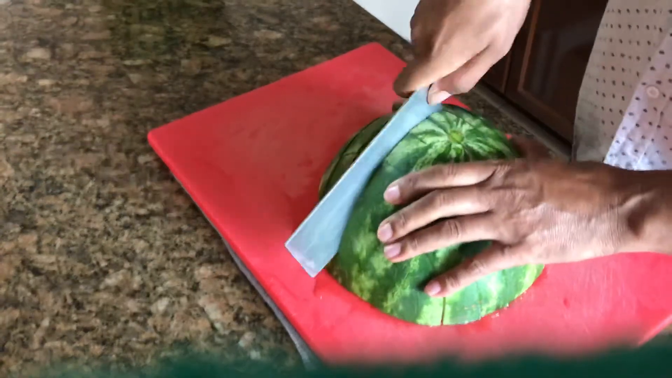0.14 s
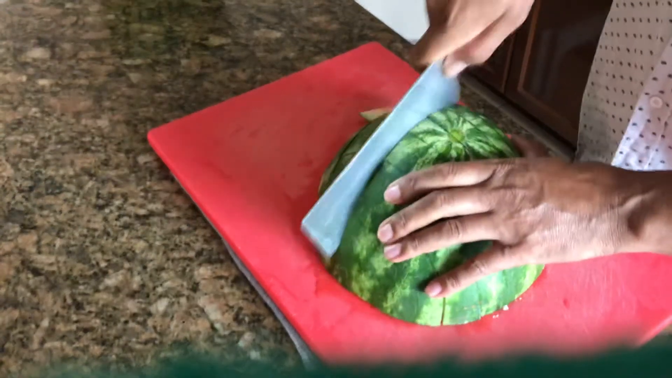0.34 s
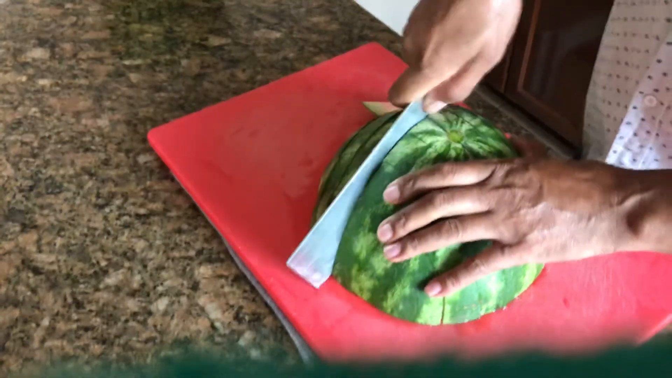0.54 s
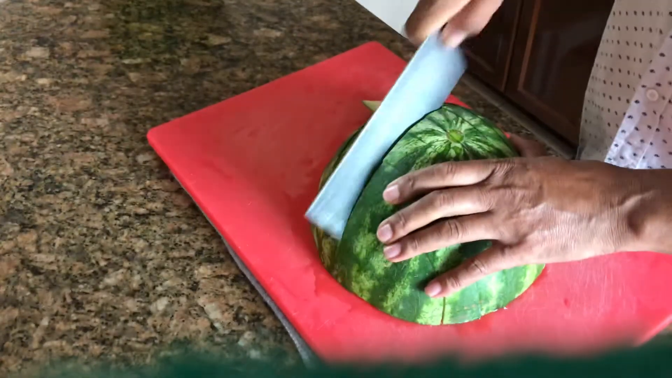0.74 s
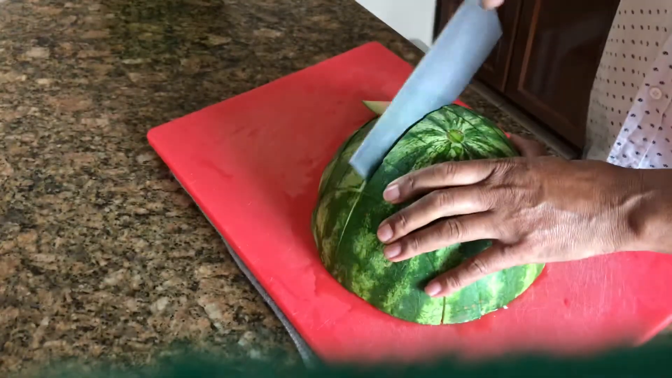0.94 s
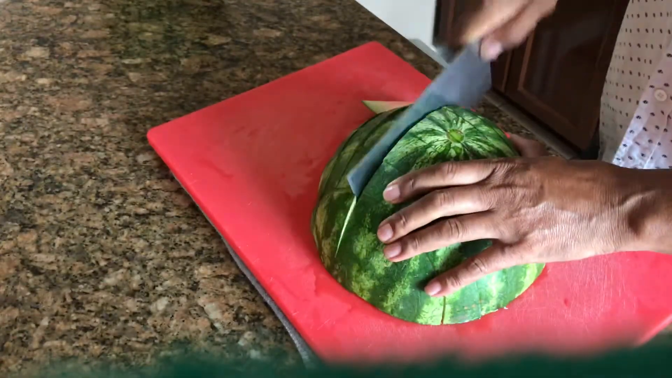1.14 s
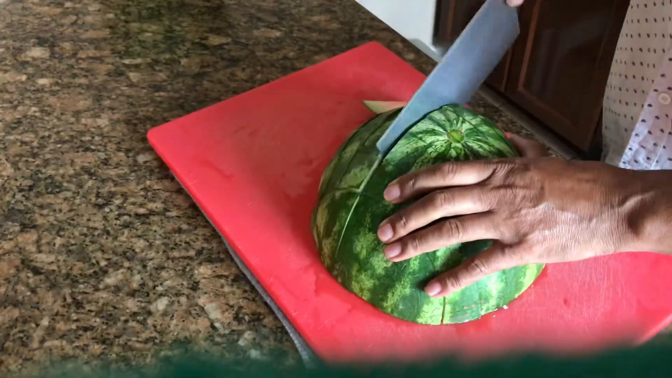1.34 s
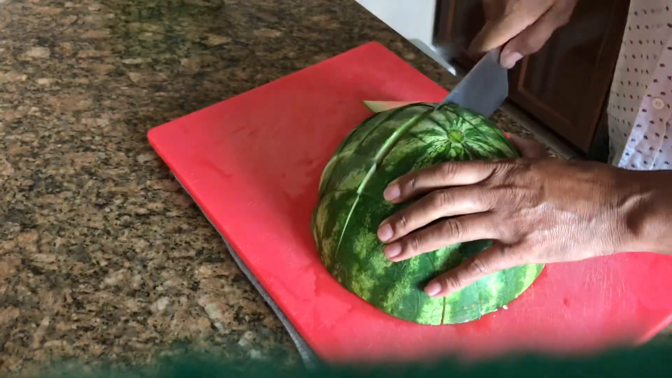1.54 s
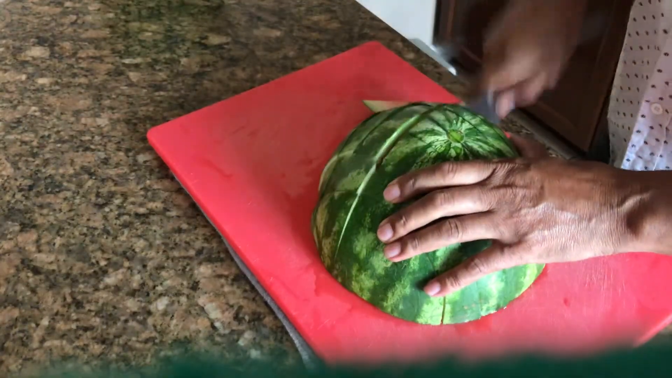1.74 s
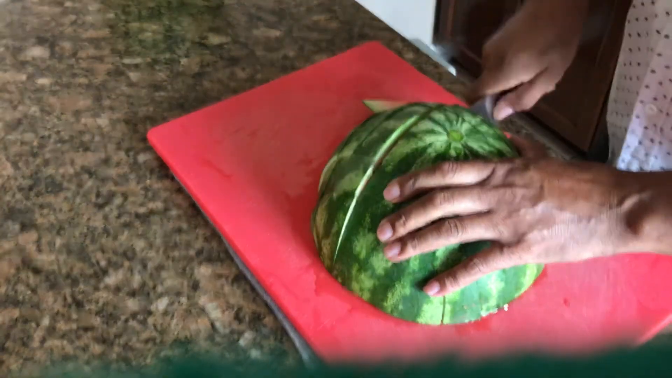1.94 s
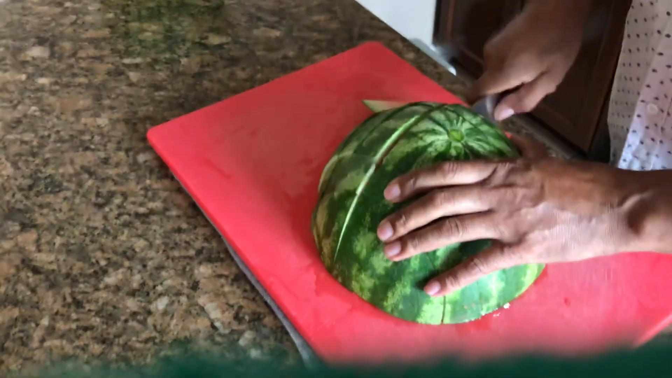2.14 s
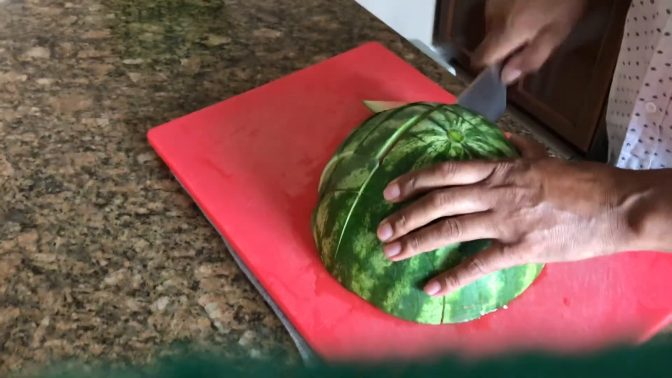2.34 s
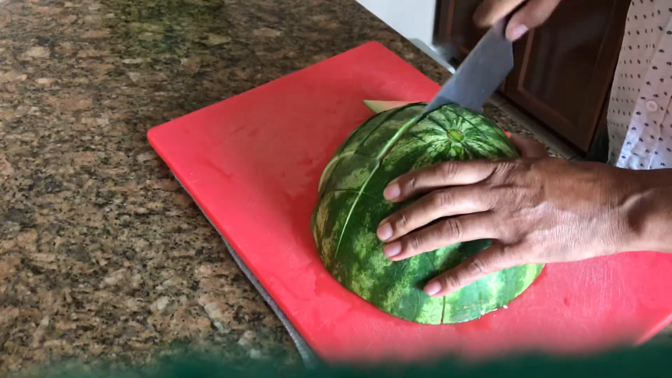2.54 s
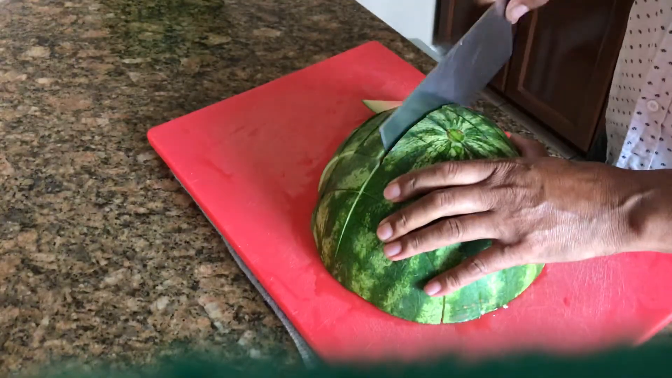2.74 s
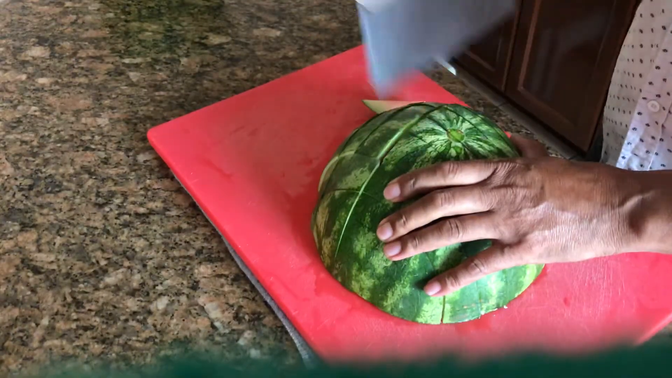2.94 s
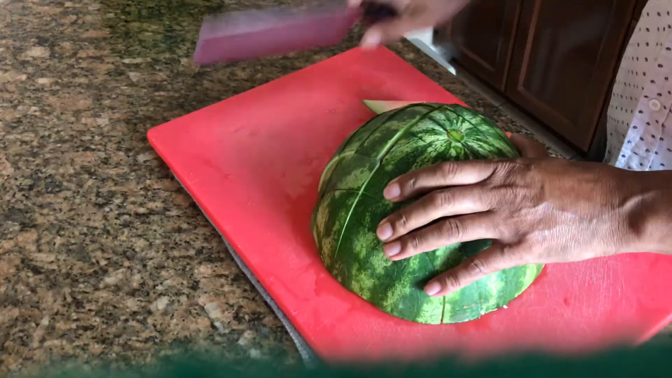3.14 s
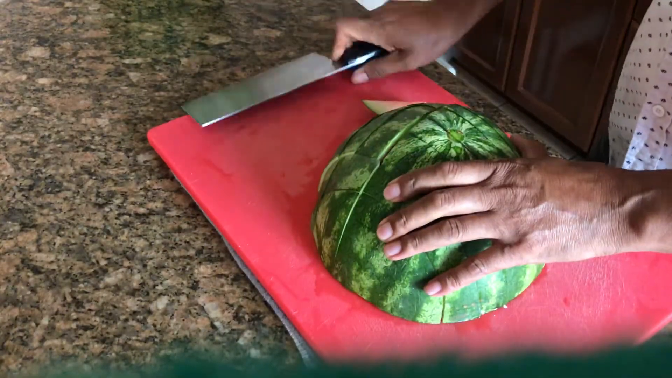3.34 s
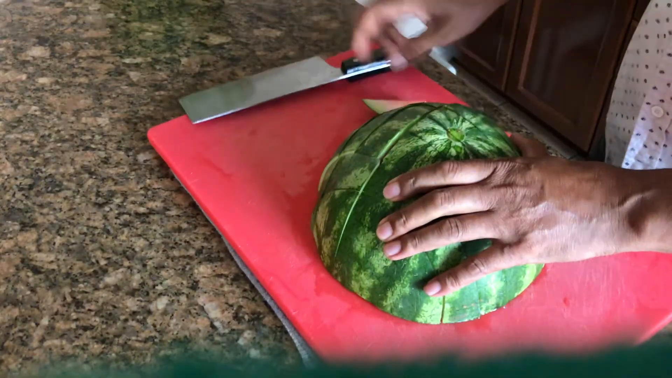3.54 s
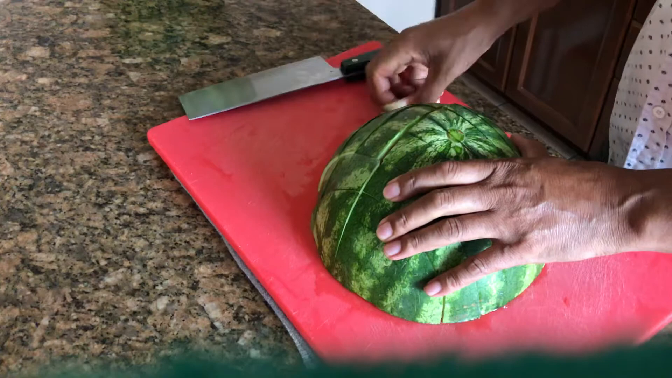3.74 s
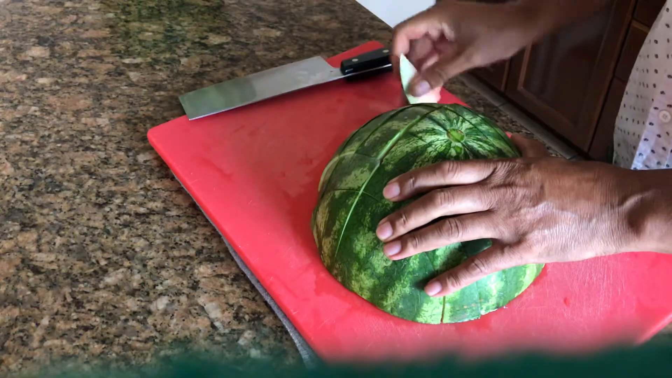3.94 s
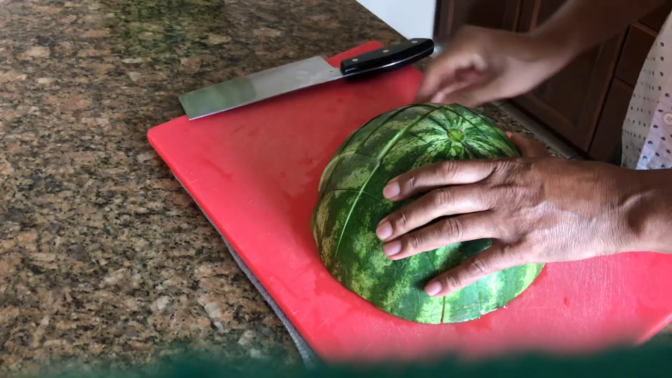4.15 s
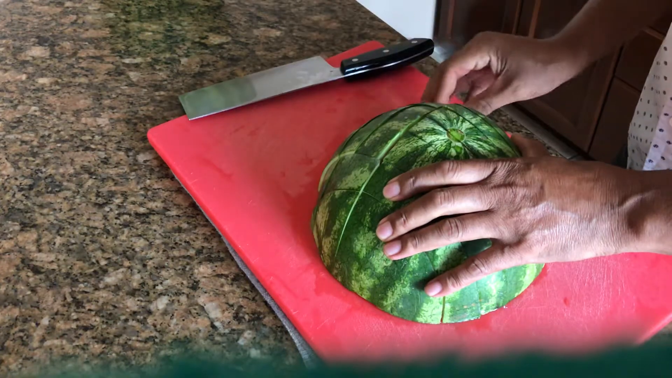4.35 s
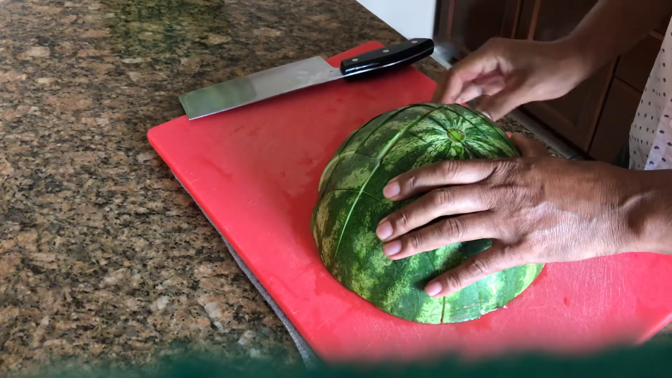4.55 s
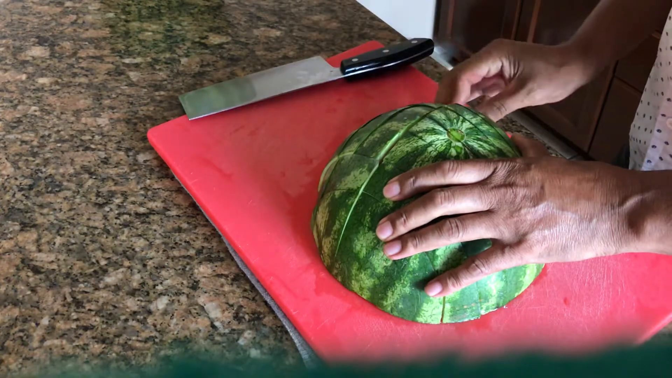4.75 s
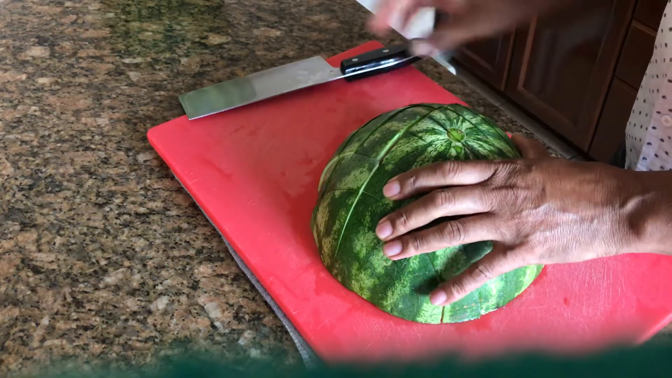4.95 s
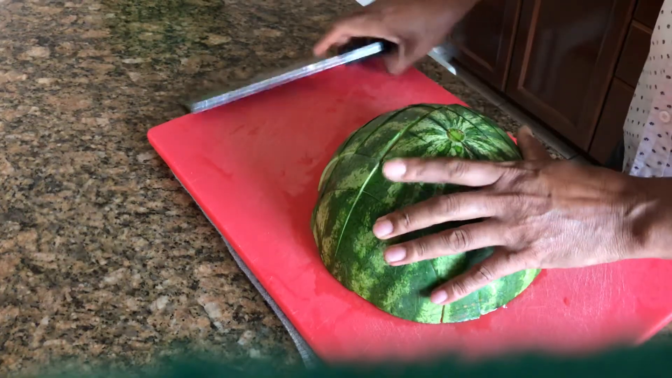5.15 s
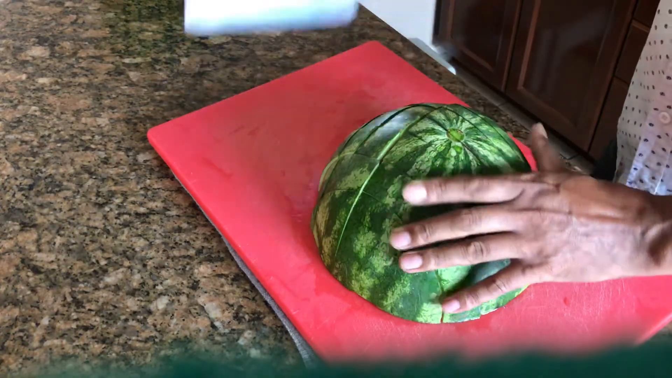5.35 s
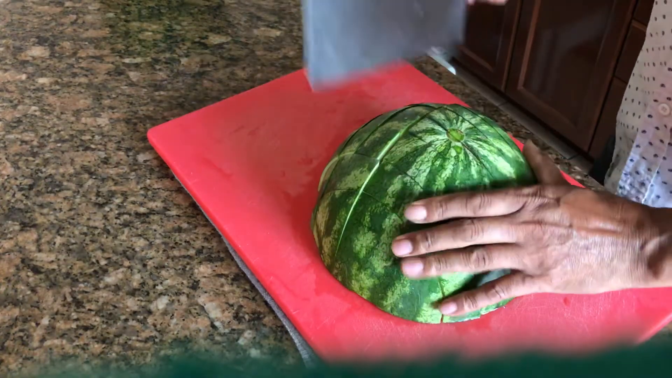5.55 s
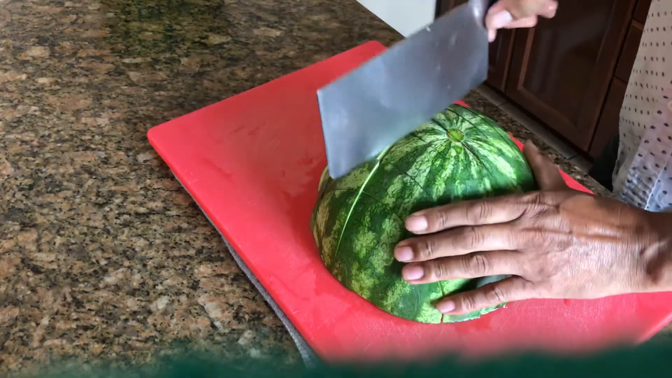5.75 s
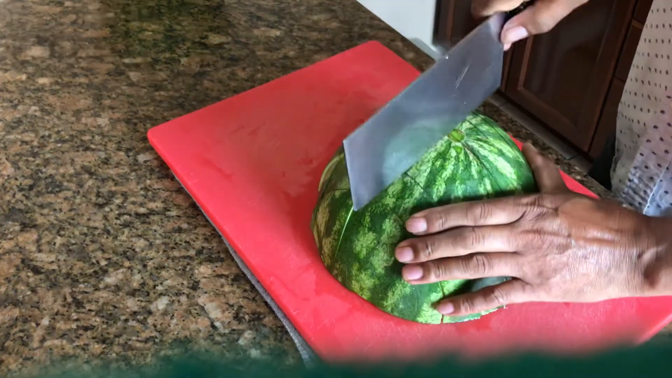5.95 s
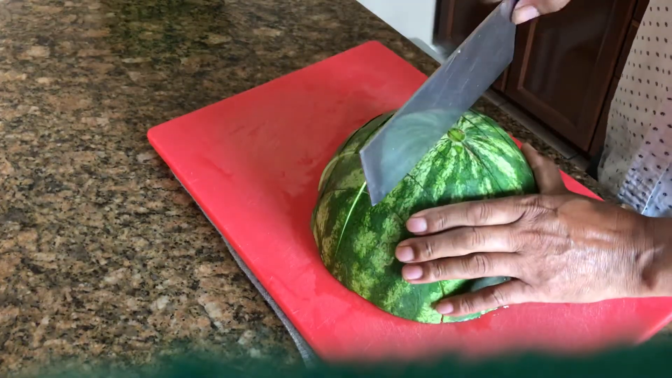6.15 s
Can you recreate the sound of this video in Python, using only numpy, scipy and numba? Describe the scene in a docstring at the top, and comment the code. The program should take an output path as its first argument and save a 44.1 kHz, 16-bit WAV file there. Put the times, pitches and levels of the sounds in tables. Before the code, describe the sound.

A close microphone in a small reflective kitchen, with steady low appliance hum throughout. From 0 to 0.45 seconds a blade slides through wet rind in short gritty hisses with a tiny wet tick, ending in a loud hollow knock on a plastic board at 0.46. Softer slides come around 1.1 to 1.6, with faint high bird chirps, then a crisper knock with a low counter thump at 1.8. Weak dull bumps follow at 2.0 and 2.2, then near quiet, with fainter chirps around 3. At 3.3 to 3.6 the cleaver is laid down in a quick clatter, loudest at 3.5, its ring choked. Faint wet rubbing passes around 4.5. At 5.1 to 5.2 the blade scrapes up with a bright steel ring, stilled by about 5.6. Distant chirps, a soft slide, and at 5.95 a small wet tick as the blade meets rind.

```python
"""Wet slides of blade and fingers on melon rind, then a cleaver knocking on a plastic board on a stone counter:
noise grains under bell-shaped pushes, and struck modes for board and counter. The cleaver is laid down with
a clatter and lifted again, ringing: steel modes driven by gritty scrapes, with damping that changes in time.
Wet ticks are short noise bursts. A small hard kitchen echoes it over appliance hum (shaped noise and tones)
and a bird outside (warbled sine chirps)."""
import sys
import numpy as np
from scipy import signal
from scipy.fft import rfft, irfft, next_fast_len
from scipy.io import wavfile
from scipy.ndimage import uniform_filter1d
from numba import njit

SR = 44100
rng = np.random.default_rng(int(sys.argv[2]) if len(sys.argv) > 2 else 0)


def inscribe(sig):
    """Save sig as 16-bit PCM at rate SR to the path in sys.argv[1].

    A 1-D sig is mono; a 2-D sig holds one channel per row.
    Samples are clipped to [-1, 1] before scaling.
    """
    pcm = np.round(np.clip(np.atleast_2d(sig).T, -1, 1) * 32767)
    wavfile.write(sys.argv[1], SR, pcm.astype(np.int16))


N = 276948
T = np.arange(N) / SR  # s


def undb(db):
    """Decibels to gain."""
    return 10 ** (np.asarray(db) / 20)


def unit(x):
    """Scale to rms 1."""
    return x / np.sqrt(np.mean(x ** 2))


def band(x, hz, width_hz):
    """Two-pole band-pass, gain 1 at the centre."""
    return signal.lfilter(*signal.iirpeak(min(hz, .45 * SR), hz / width_hz, SR), x)


def shaped(points):
    """Noise of rms 1 with the spectrum of the (Hz, dB) points."""
    hz, db = np.transpose(points)
    size = next_fast_len(N, True)
    log_hz = np.log(np.arange(size // 2 + 1) * SR / size + 1)
    spectrum = rfft(rng.standard_normal(size)) * undb(np.interp(log_hz, np.log(hz), db))
    return unit(irfft(spectrum, size)[:N])


def walk(rate_hz):
    """Random levels held for 1 / rate_hz, smoothed twice over that span; rms 1."""
    hold = int(SR / rate_hz)
    steps = np.repeat(rng.standard_normal(N // hold + 1), hold)
    return unit(uniform_filter1d(uniform_filter1d(steps, hold), hold)[:N])


def add(track, start_s, sound):
    """Mix a sound into the track at start_s."""
    i = int(start_s * SR)
    track[i:i + len(sound)] += sound[:N - i]


def struck(modes, contact_ms, tilt_db=0., rise_ms=0.88, sign=-1):
    """Modes answer one smooth push, duller with longer contact; signs alternate unless sign is 1. Peak 1."""
    t = T[:int(1.3 * SR * np.max(modes, axis=0)[-1])]
    free = 0
    for k, (hz, db, t60_s) in enumerate(modes):
        gain = sign ** k * undb(db + tilt_db * np.log2(hz / 800))
        free = free + gain * np.sin(2 * np.pi * hz * t) * 1000. ** (-t / t60_s)
    push = np.sin(np.pi * np.clip(T[:SR // 20] * 1000 / contact_ms, 0, 1)) ** 2
    out = signal.fftconvolve(free * (1 - np.exp(-t * 1000 / rise_ms)), push)
    return out / np.abs(out).max()


def board():
    """Each contact: a hollow knock, a boom, a slow thump of the counter and a short noise crack."""
    # cleaver blows: edge on the board, plus faint ticks and the blade set down on the rind:
    # start_s, knock_db, boom_db, thump_db, contact_ms, knock_tilt_db_per_octave, crack_hz
    blows = [(0.255, -39.5, -33, -45, 0.78, -18, 3800), (.463, -1.75, -13, -39, 0.84, 2.8, 4000),
             (1.7907, -1.5, -8, -29.5, 0.39, 5, 2396), (2.0255, -24.5, -26, -28, 1.07, -0.5, 2000),
             (2.2224, -23, -22.5, -29, 0.87, -5, 1870), (2.275, -45, -30.5, -42.5, 0.63, -1, 2010),
             (4.179, -63, -47, -51, .65, 4, 2700), (5.944, -62.5, -52.5, -35.5, 0.86, -1, 3500)]
    # cleaver clatter: laid down (3.34 to 3.74 s), then lifted off the board (5.13 to 5.21 s):
    # start_s, knock_db, boom_db, thump_db, crack_db, knock_tilt_db_per_octave
    clatter = [(3.34, -18.5, -27.5, -48.5, -20, 0.5), (3.414, -15.5, -23.5, -52, -19, -8),
               (3.451, -22, -36, -45, -24, -10), (3.48, -28, -44, -42, -26, 0),
               (3.494, -4, -16.5, -37, -10.5, 14.5), (3.533, -14.5, -22.5, -39.5, -19.5, 5.5),
               (3.568, -17, -32, -56.5, -22.5, 9), (3.588, -13.5, -25.5, -49, -11, 17),
               (3.735, -32.5, -48, -50, -42, 5), (5.130, -26.5, -22, -33, -30, -4.5),
               (5.137, -22, -24, -43.5, -34.5, 4), (5.187, -23.5, -36, -42.5, -12, 6),
               (5.212, -18, -25, -48, -11.5, 1.5)]
    # modes of knock, board boom, counter thump: pitch_hz, relative_level_db, t60_s
    knock_modes = [(511, -4, 0.018), (702, 3, 0.013), (910, -6.5, 0.0067), (875, -4, 0.016),
                   (1098, 0.5, .012), (1430, -0.5, 0.0069), (2060, -8.5, 0.0087), (2525, -17.5, .01),
                   (3120, -26, 0.0083)]
    boom_modes = [(114.5, -17, 0.35), (165, -10., 0.03), (196, -3, 0.13), (280, -3.5, 0.07),
                  (324, 5, 0.038), (413.4, 5, 0.04)]
    thump_modes = [(51.7, -7.5, .3), (67.2, -1, .35), (83, -6, 0.28)]
    clatter_contact_ms, clatter_crack_hz = 0.51, 3290
    blow_crack_db, crack_cycles = -17, 3.4  # level re knock; decay constant in cycles
    boom_lag_s = .0018  # the board takes a moment to answer

    out = np.zeros(N)
    thump = struck(thump_modes, 10.0)
    boom = struck(boom_modes, 1.4, sign=1)
    contacts = [(s, db, boom_db, thump_db, db + blow_crack_db, ms, tilt_db, hz)
                for s, db, boom_db, thump_db, ms, tilt_db, hz in blows]
    contacts += [(s, db, boom_db, thump_db, crack_db, clatter_contact_ms, tilt_db, clatter_crack_hz)
                 for s, db, boom_db, thump_db, crack_db, tilt_db in clatter]
    for s, knock_db, boom_db, thump_db, crack_db, contact_ms, tilt_db, crack_hz in contacts:
        crack = rng.standard_normal(SR // 20) * np.exp(-T[:SR // 20] * crack_hz / crack_cycles)
        for _ in range(2):
            crack = band(crack, crack_hz, 0.63 * crack_hz)
        add(out, s, undb(knock_db) * struck(knock_modes, contact_ms, tilt_db))
        add(out, s + boom_lag_s, undb(boom_db) * boom)
        add(out, s, undb(thump_db) * thump)
        add(out, s, undb(crack_db) * crack / np.abs(crack).max())
    return out


@njit
def ring(force, hz, loss):
    """One mode, a driven rotating phasor, whose loss (1/s) may change as it rings."""
    out, z, turn = np.empty(len(force)), 0j, np.exp(2j * np.pi * hz / SR)
    for i in range(len(force)):
        z = z * turn * (1 - loss[i] / SR) + force[i] + 1e-18
        out[i] = z.imag
    return out


def steel_damping():
    """Extra loss of the steel (1/s): high while it lies on the board, low in the air, moderate once stilled."""
    laid_s, lifted_s, stilled_s = 3.496, 5.22, 5.56  # lies flat, leaves the board, stilled by the hand
    free_loss, laid_loss, held_loss = .4, 25, 12  # 1/s; laid and held add to free
    settle_s = .05

    def after(s):
        return np.clip((T - s) / settle_s, 0, 1)

    lying = (T > laid_s) * (1 - after(lifted_s))
    return free_loss + laid_loss * lying + held_loss * after(stilled_s)


def blade():
    """Steel modes driven by gritty scrapes, damped when the blade lies down; the grit itself is heard too."""
    # blows on the steel: start_s, ring_db, tilt_db_per_octave (scaled for the grit), first_bending_extra_db,
    # second_bending_extra_db, scrape_decay_ms, grit_db
    clanks = [(3.337, -27.5, -10, 11, -6, 3.6, -32), (3.413, -32.5, -16, -3.5, -5, 4.6, -23.5),
              (3.450, -34, -8, -8, -3.5, 5.1, -24.5), (3.493, -21.5, -4.5, -3, -5, 6.7, -10.5),
              (3.568, -28, -7.5, -5.5, -1.5, 7.2, -24), (3.59, -25.5, -3.5, -4.5, -6.5, 2.73, -16.5),
              (5.127, -41, -12.5, 5.5, -3.5, 26, -36), (5.186, -36.5, -17, -14.5, -2.5, 14, -30.5),
              (5.212, -14.5, -0.5, -24, -15, 38.6, -24), (5.284, -32, -6.5, 16, 16, 5.2, -41)]
    # blade modes: relative_level_db, t60_s before extra damping
    blade_modes = [(-16.5, 0.24), (-21.5, 0.12), (-13, 0.62), (-15, 0.076), (-17.5, 0.82), (-19, 0.12),
                   (-18, 0.046), (-14, 0.15), (-15, 0.24), (-25, .9), (-10, 0.32), (-16, .18),
                   (-6.5, 0.081), (-17, 0.28), (-13, 0.049), (-6, 0.03), (-19.5, 0.059), (-39, .08),
                   (-17.5, 0.11), (-13.5, 0.11), (-12.5, .08), (-25.5, .06), (-22, .08), (-23.5, .1)]
    # pitches of those modes: pitch_hz
    blade_hz = [1028, 1450, 1916, 2130, 2406, 2592, 2875, 3273, 3348, 4350, 4717, 5044, 5275, 5615, 5857,
                6352, 6977, 7913, 9265, 9631, 10850, 12600, 14280, 14780]
    # ring level as the blade turns its face: time_s, level_db
    face = [(3.3, -2), (3.49, 5.5), (3.51, 6), (5.15, 3.5), (5.22, 1.5), (5.276, -3), (5.3, -6.8),
            (5.408, -9), (5.435, -7), (5.46, -10), (5.49, 0), (5.55, -6)]
    bending_hz, second_bending_hz = 1916, 2406

    face_s, face_db = np.transpose(face)
    start, size = int(face_s[0] * SR), SR // 4
    damping = steel_damping()[start:]
    out, rattle = np.zeros(N), np.zeros(N)

    grit = rng.standard_normal((len(clanks), size))
    grit = grit * undb(4.9 * rng.standard_normal((len(clanks), size)))  # uneven grains
    scrapes = [g * np.exp(-T[:size] * 1000 / decay_ms) / g.std()
               for g, (*_, decay_ms, _) in zip(grit, clanks)]

    f = np.arange(size // 2 + 1) * SR / size + 1
    octaves = 1.12 * np.log2(np.maximum(f, 3000) / 4000) + 4.0 * np.log2(np.maximum(f / 10500, 1))
    for (s, _, tilt_db, *_, grit_db), scrape in zip(clanks, scrapes):
        colour = undb(tilt_db * octaves) * np.minimum(f / 1300, 1)
        coloured = irfft(rfft(scrape) * colour, 2 * (size // 2))
        add(rattle, s, undb(grit_db) * coloured[:int(.23 * SR)])

    for hz, (db, t60_s) in zip(blade_hz, blade_modes):
        force, wave = np.zeros(N), np.exp(2j * np.pi * hz * T[:size])
        for (s, ring_db, tilt_db, bend_db, second_db, _, _), scrape in zip(clanks, scrapes):
            gain_db = ring_db + db + tilt_db * np.log2(max(hz, 2500) / 4000)
            gain_db += bend_db * (hz == bending_hz) + second_db * (hz == second_bending_hz)
            # each mode's drive is mostly normalised, so ring levels follow the table
            reach = np.abs(scrape @ wave) ** .8 * np.linalg.norm(scrape) ** .2
            add(force, s, undb(gain_db) * scrape / reach)
        out[start:] += ring(force[start:], 1. * hz, np.log(1000) / t60_s + damping)
    face_db = uniform_filter1d(np.interp(T, face_s, face_db), SR // 100)
    return out * undb(face_db) + rattle


def swell(peak_s, rise_s, fall_s):
    """A bell-shaped push, with its own widths before and after the peak."""
    return np.exp(-((T - peak_s) / np.where(T < peak_s, rise_s, fall_s)) ** 2)


def sliding():
    """Fibres tear in dense uneven grains; the pressure shakes the counter."""
    # blade and fingers slide on wet rind: peak_s, rise_s, fall_s, hiss_db (before body_db),
    # shine_db re hiss_db (above 7 kHz), counter_shake_db
    strokes = [(.03, 0.085, 0.086, -60.5, -2.5, -51.5), (0.177, 0.06, 0.037, -47, -1, -50.5),
               (0.331, 0.08, .025, -55.5, -3.5, -42), (0.456, 0.067, 0.013, -50, -3.5, -43),
               (.7, 0.046, 0.18, -66.5, -1.5, -76), (1.064, 0.03, 0.079, -55, -3, -62),
               (1.195, 0.044, 0.029, -53, -3.5, -53), (1.27, 0.067, 0.11, -70.5, 1, -62),
               (1.495, 0.038, 0.038, -60.5, -4, -51.5), (1.559, 0.051, 0.03, -53, -3.5, -53),
               (1.787, 0.047, 0.023, -48.5, -5, -45.5), (2.03, 0.099, 0.2, -61, -5, -62),
               (2.22, 0.039, 0.034, -63, -2.5, -55), (2.32, 0.094, 0.15, -69.5, -7, -62),
               (2.727, .013, 0.091, -63.5, -18, -66), (4.45, 0.16, .3, -63, -6.5, -63.5),
               (4.67, .05, 0.088, -85, -9, -64.5), (5.65, 0.13, 0.18, -70, -10, -78),
               (5.95, 0.01, 0.042, -70.5, -6, -51.5)]
    # middle of the rind spectrum: pitch_hz, relative_level_db_per_hz
    rind = [(300, -5), (700, -15.5), (1200, -8), (2600, -9.5), (4200, -6.5), (6500, -14)]
    body_db = 3.5
    shake_lag_s, rest_shake_db = 0.015, -71  # counter follows the push; resting hand keeps it trembling

    hiss, gloss = 0, 0
    press = undb(rest_shake_db + 4.1 * walk(5.8))
    for s, rise_s, fall_s, hiss_db, shine_db, shake_db in strokes:
        push = swell(s, rise_s, fall_s)
        hiss = hiss + undb(hiss_db) * push
        gloss = gloss + undb(hiss_db + shine_db) * push
        press = press + undb(shake_db) * push
    grain = unit(undb(0.61 * walk(400) + 2.2 * walk(30)))
    body = shaped([(100, -48.5)] + list(rind) + [(9000, -40.0)])
    shine = shaped([(5000, -30.5), (8000, -2.5), (13500, -2.5), (16000, -11.5)])
    shake = unit(band(band(rng.standard_normal(N), 68, 30), 66, 52))
    tearing = grain * (undb(body_db) * hiss * body + gloss * shine)
    return tearing + np.interp(T - shake_lag_s, T, press) * shake


def juice():
    """Tiny wet ticks: band-passed noise bursts of a few ms."""
    # start_s, level_db, pitch_hz
    ticks = [(0.324, -44, 5050), (0.34, -32.5, 8410), (1.286, -48, 8380), (2.8598, -47.5, 6730),
             (3.9579, -55.5, 11850), (5.9459, -39, 8600)]
    out = np.zeros(N)
    for s, db, hz in ticks:
        tick = band(rng.standard_normal(220) * np.exp(-T[:220] / 0.0019), hz, 6000)
        add(out, s, undb(db) * tick / np.abs(tick).max())
    return out


def bird():
    """Fast chirps: gliding sines whose pitch warbles at random."""
    # chirps beyond the window: start_s, length_s, start_hz, end_hz, level_db
    chirps = [(0.93, 0.057, 8120, 8700, -67), (1.265, 0.11, 8020, 8550, -62.5),
              (1.398, .1, 8730, 7640, -61.5), (1.598, 0.073, 7970, 8050, -64),
              (2.87, 0.08, 7430, 8500, -70.5), (3.04, 0.08, 7300, 8360, -68),
              (5.466, 0.06, 8030, 8270, -67.5), (5.678, 0.077, 7470, 8280, -66)]
    out, flutter = np.zeros(N), walk(400)
    for s, length_s, start_hz, end_hz, db in chirps:
        t = T[:int(length_s * SR)]
        hz = np.interp(t, [0, length_s], [start_hz, end_hz])
        hz = hz + 420 * flutter[int(s * SR):][:len(t)]
        envelope = np.sin(np.pi * t / length_s) ** .5
        add(out, s, undb(db) * envelope * np.sin(2 * np.pi * np.cumsum(hz) / SR))
    return out


def kitchen():
    """Appliance noise, slowly varying in level, with a few wavering tones made of narrow-band noise."""
    # noise spectrum: pitch_hz, relative_level_db_per_hz
    hum = [(15, -42), (25, -19), (152, -6), (349, -12), (421, -16), (552, -15), (666, -14), (804, -16),
           (3170, -32.5), (4380, -34), (15500, -39.5)]
    # tones: pitch_hz, width_hz, level_db
    whine = [(106, 6.3, -69), (209, 8.7, -69.5), (585.5, 12, -74), (4560, 53, -74.5), (4400, 150, -75)]
    hum_db = -59.5
    tones = sum(undb(db) * unit(band(rng.standard_normal(N), hz, width_hz)) for hz, width_hz, db in whine)
    return undb(hum_db + 1.1 * walk(1.5)) * shaped(hum) + tones


def echo(x):
    """Dense reflections that start after a few ms and die faster in the treble."""
    # pitch_hz, t60_s
    room = [(125, 0.35), (500, 0.5), (1500, 0.58), (4000, 0.47), (12000, 0.15)]
    room_db = -9.5
    room_hz, room_t60_s = np.transpose(room)
    t, tail = T[:SR], 0
    for hz in 63 * 2. ** np.arange(9):
        t60_s = np.interp(np.log(hz), np.log(room_hz), room_t60_s)
        tail = tail + band(rng.standard_normal(SR), hz, hz * 1.3) * 1000. ** (-t / t60_s)
    tail = tail * np.clip((t - .002) / .005, 0, 1)
    return undb(room_db) * signal.fftconvolve(x, tail / np.linalg.norm(tail))[:N]


def scene():
    """Near sounds with their echo, the far bird with a stronger echo, and the hum."""
    near, far = board() + blade() + sliding() + juice(), bird()
    return (near + far + echo(near + undb(7.0) * far) + kitchen())[None]


def record(dry):
    """The microphone loses the deep bass, its port dips at two notches and the top is cut."""
    # pitch_hz, width_hz, share_removed
    mic_dips = [(4770, 1400, .5), (10670, 660, 0.57)]
    top_hz = 15750
    dry = signal.sosfilt(signal.butter(2, 42, "high", fs=SR, output="sos"), dry)
    for hz, width_hz, share in mic_dips:
        dry = dry - share * band(dry, hz, width_hz)
    return signal.sosfilt(signal.ellip(10, .2, 70, top_hz, fs=SR, output="sos"), dry)


dry = scene()
out = record(dry)
inscribe(out)
```